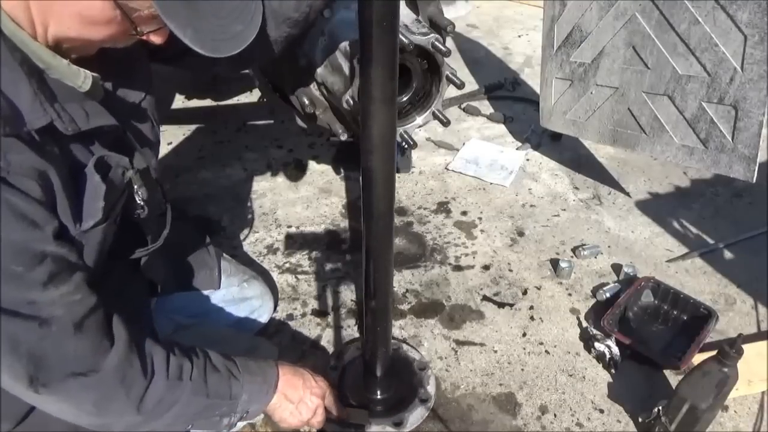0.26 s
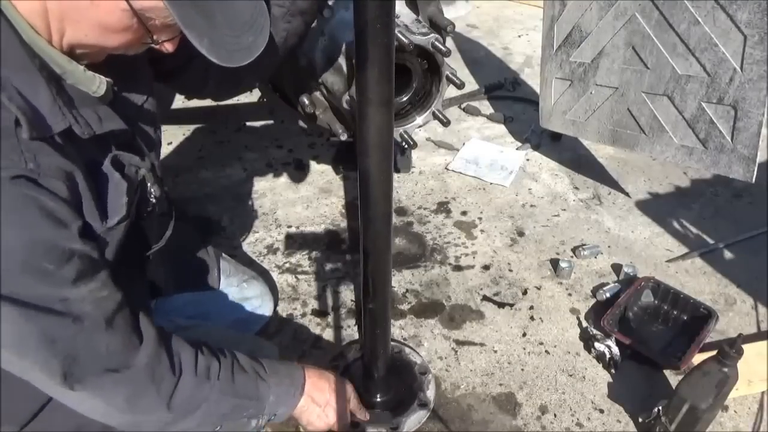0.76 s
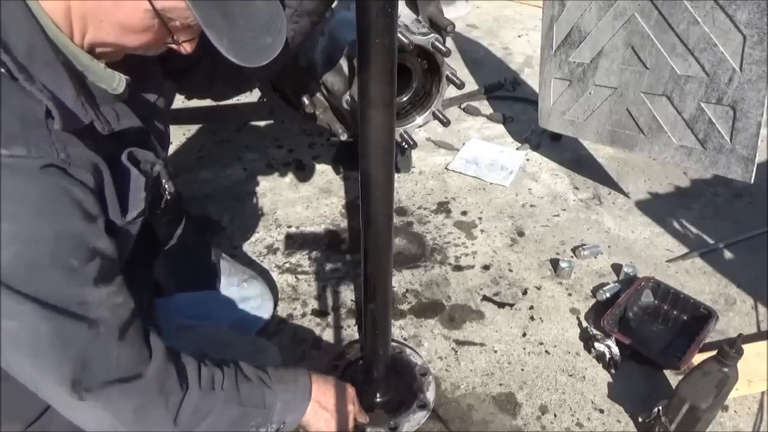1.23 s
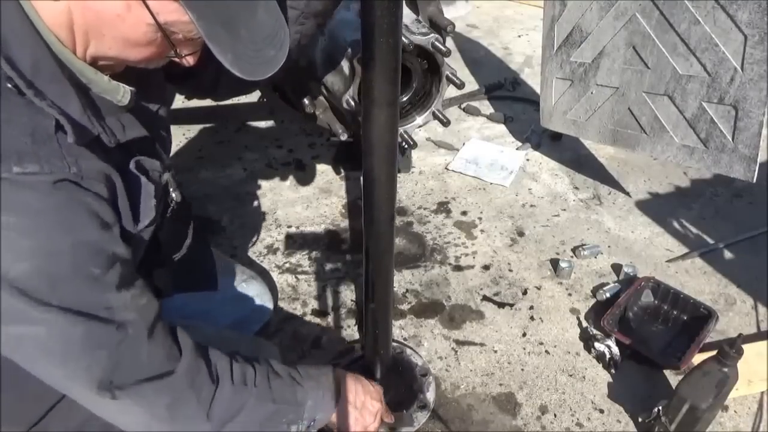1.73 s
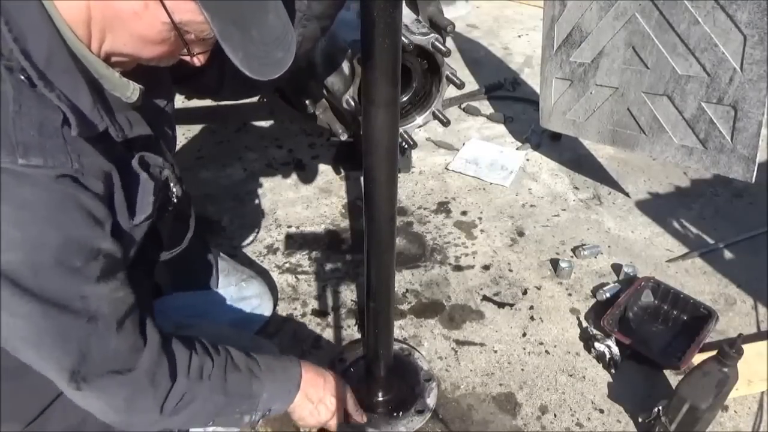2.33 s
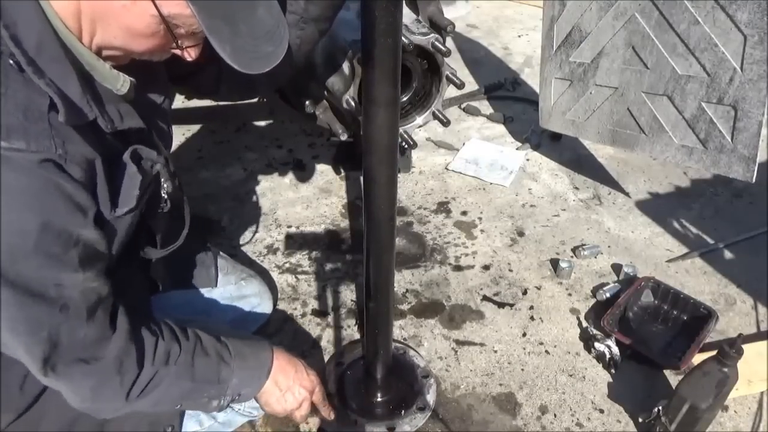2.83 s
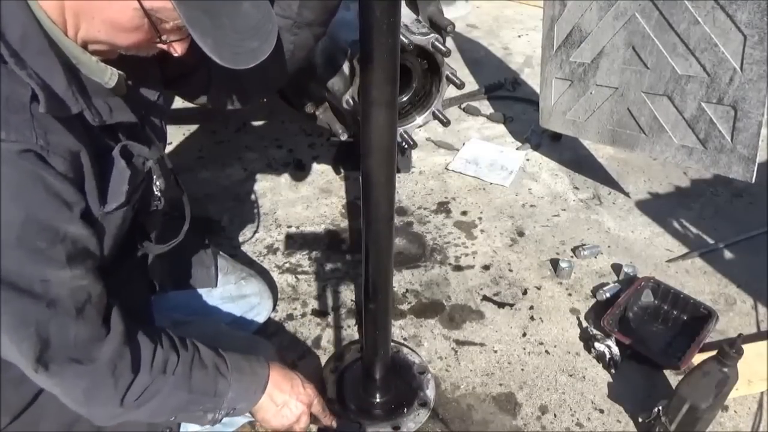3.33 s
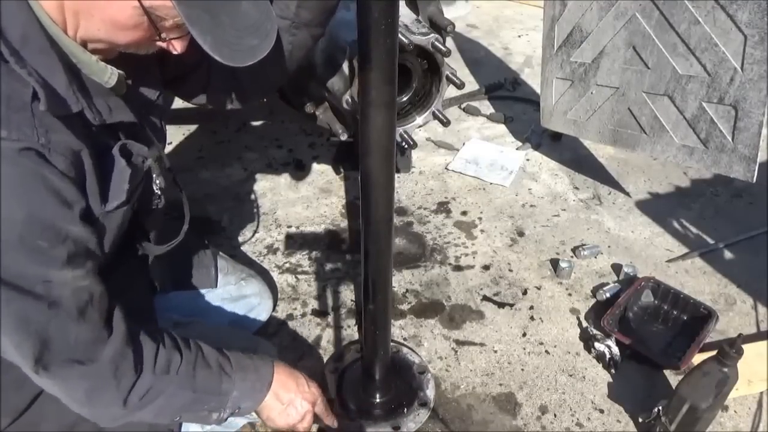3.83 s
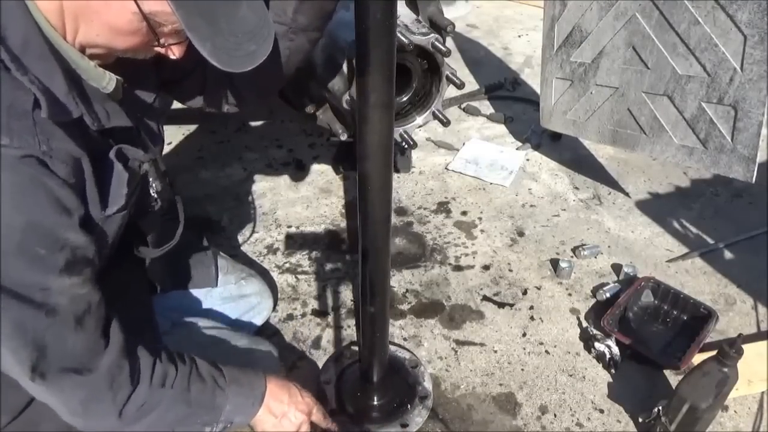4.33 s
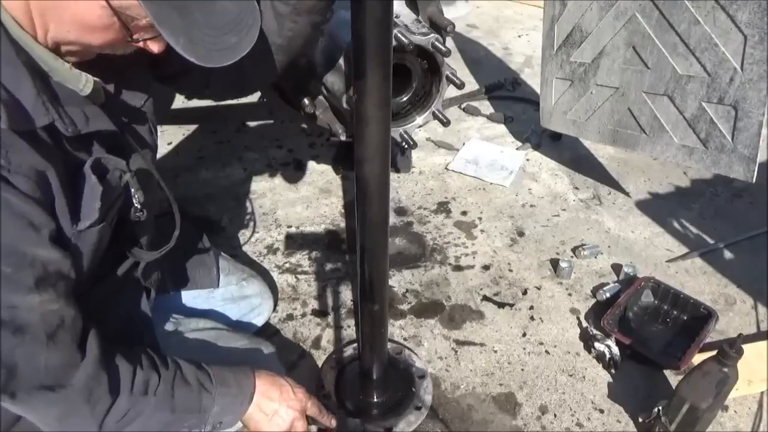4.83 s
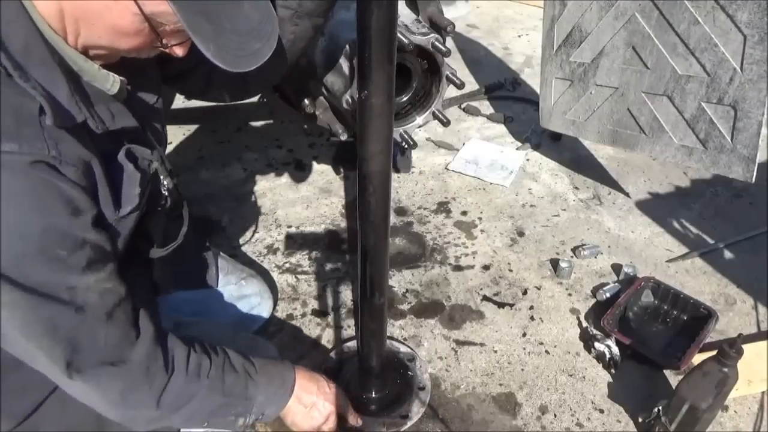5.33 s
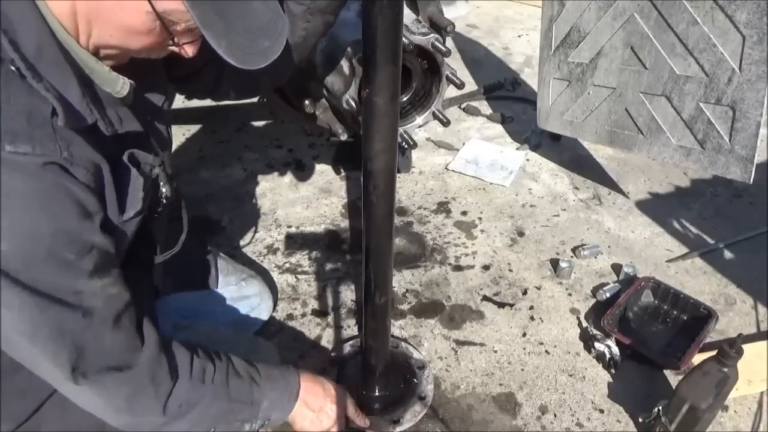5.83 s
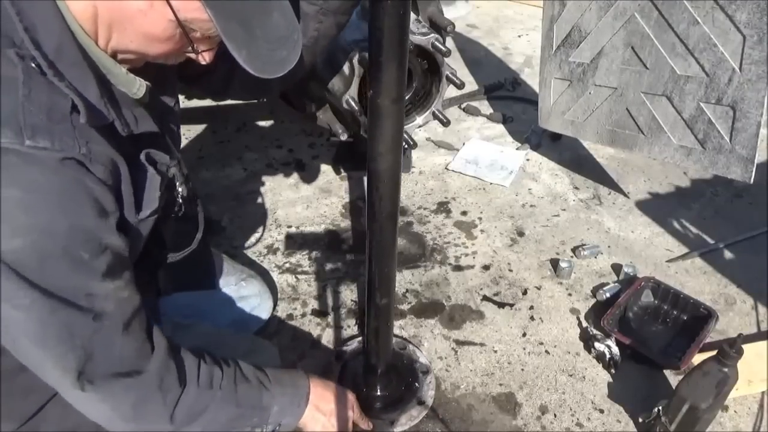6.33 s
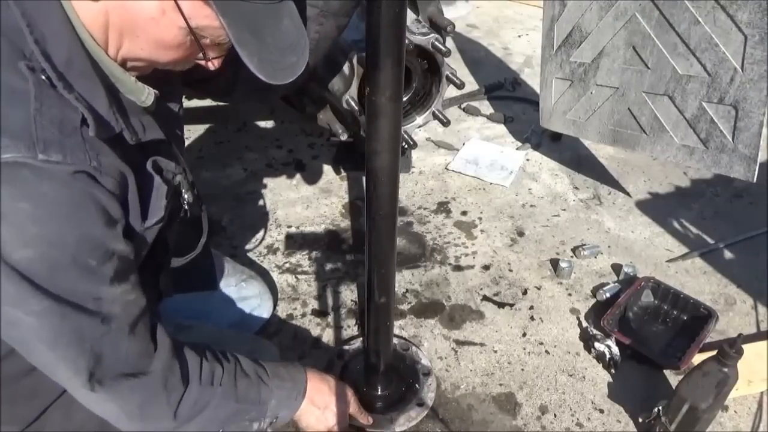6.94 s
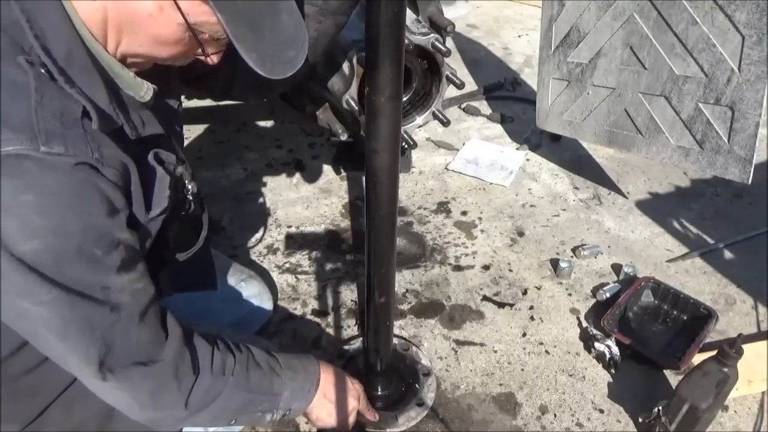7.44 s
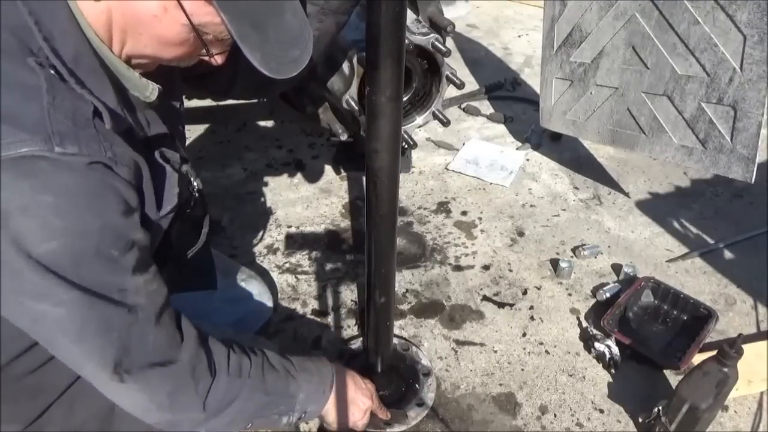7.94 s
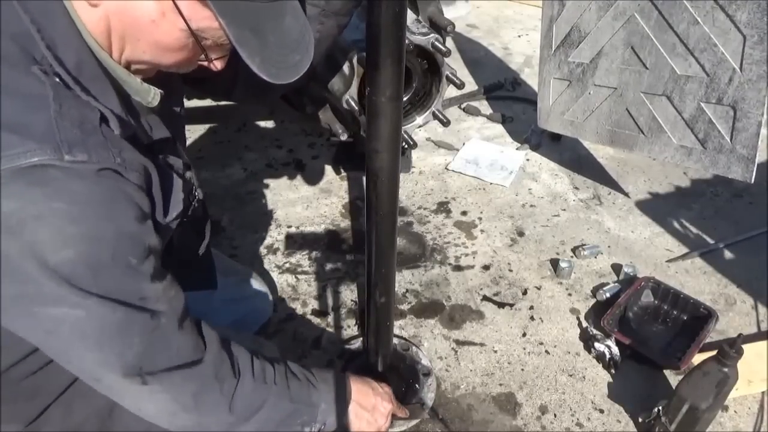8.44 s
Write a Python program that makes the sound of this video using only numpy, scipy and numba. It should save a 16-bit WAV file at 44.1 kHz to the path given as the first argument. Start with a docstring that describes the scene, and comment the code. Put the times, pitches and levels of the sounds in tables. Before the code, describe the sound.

A hand-held putty knife rasps stuck material off a steel axle part: short dry scratches in busy runs, with blade chatter and thin, damped ringing. Two lulls hold isolated taps and knocks before scraping picks up again. Open yard with slight reflections from the ground and a nearby wall, low traffic behind, and low wind buffets on the close microphone in the last two seconds.

```python
"""From the start a steel putty knife scrapes old gasket off a steel axle flange in quick to-and-fro strokes, outdoors
near a wall: noise for the grit drives broad blade rattles and long thin flange modes, which a hand damps.
Now and then the knife taps the flange, or its edge catches as a stroke sets off: short blows with blade chatter.
Distant traffic, shaped noise, hisses and rumbles throughout; towards the end gusts, bursts of
low noise, buffet the microphone."""
import sys
import numpy as np
from scipy import signal
from scipy.fft import rfft, irfft
from scipy.io import wavfile
from scipy.ndimage import uniform_filter1d
from numba import njit

SR = 44100
rng = np.random.default_rng(int(sys.argv[2]) if len(sys.argv) > 2 else 0)


def persist_wave(psi):
    """Save psi, clipped to +-1, as 16-bit WAV."""
    counts = np.round(np.clip(psi, -1, 1) * 32767).astype(np.int16)
    wavfile.write(sys.argv[1], SR, np.atleast_2d(counts).T)


def natural_amplitude(level_db):
    """Convert a level in decibels to a linear amplitude factor, elementwise."""
    exponent = np.asarray(level_db, float) / 20
    return 10 ** exponent


N = 382347
T = np.arange(N) / SR  # s

# To-and-fro strokes. Each row: fastest moment in seconds, drive on the blade in dB, length in seconds,
# bite into the bare steel (flange drive over blade drive) in dB.
STROKES = [(.003, -52.5, 0.061, 6), (0.189, -35, 0.19, -10), (0.408, -53.5, 0.094, 6.5),
           (0.523, -42, .1, -10.5), (0.74, -22.5, 0.11, -17), (0.902, -27.5, 0.096, -28),
           (1.067, -23.5, .12, -20.5), (1.248, -28.5, .1, -21), (1.418, -25.5, 0.11, -20),
           (1.584, -24.5, 0.094, -32.5), (1.722, -24, 0.079, -15.5), (1.869, -31, 0.09, -11),
           (1.989, -32.5, 0.075, -6.5), (2.16, -22, 0.11, -19), (2.309, -24, 0.088, -14),
           (2.442, -24, .1, -21), (2.586, -30.5, 0.091, -9.5), (2.718, -28.5, 0.089, -22),
           (2.818, -43.5, 0.045, -3), (2.973, -42.5, 0.063, -11), (3.103, -36, 0.1, -9.5),
           (3.279, -34.5, 0.059, -18), (3.426, -33, 0.099, -5), (3.559, -34, 0.08, -13),
           (3.685, -26, 0.073, -12), (3.82, -31.5, 0.09, -23), (3.953, -21.5, 0.082, -13.5),
           (4.101, -25, 0.098, -22), (4.416, -32.5, 0.11, -9.5), (4.505, -47, 0.075, -0.5),
           (4.639, -44.5, 0.14, -4.5), (4.776, -60, 0.095, 13), (4.921, -55.5, 0.15, 4),
           (5.251, -30, 0.11, -15), (5.408, -27.5, 0.09, -21.5), (5.557, -21, .09, -29),
           (5.688, -26.5, 0.082, -21), (5.874, -23.5, .099, -18.5), (6.016, -27.5, 0.074, -15.5),
           (6.157, -24.5, 0.08, -15.5), (6.297, -38, 0.065, -11), (6.415, -42.5, 0.066, -2.5),
           (6.634, -46, 0.03, -2.5), (6.845, -57.5, .077, -8), (6.993, -49, 0.051, -5),
           (7.104, -41, .074, -4), (7.234, -36, 0.065, -12.5), (7.352, -35, 0.064, -4),
           (7.48, -37, 0.057, -13.5), (7.604, -37, 0.082, -5), (7.731, -34.5, 0.063, -18),
           (7.857, -31.5, .089, -7.5), (8.0, -32.5, 0.084, -20), (8.14, -28.5, 0.093, -14.5),
           (8.284, -30.5, 0.093, -17.5), (8.436, -29.5, 0.1, -11), (8.593, -34.5, 0.12, -14)]
# How the knife leans. Each row: time in seconds, pitch factor of the edge rattle,
# drive of the blade's edge over its body in dB.
LEAN = [(0, 0.99, 2), (1.1, 0.97, -5), (1.7, .985, 3.2), (2.8, 1.004, 0.5), (3.2, 0.99, 3.5), (3.9, 1, 1.5),
        (4.5, .99, 2.5), (5.3, 0.98, 0), (6.2, 1.004, 0.3), (7.1, 1.014, 3.5), (8.0, 1.013, 5),
        (8.67, 1.01, -2)]
# Nearness to the rim as the knife works round the flange. Each row: time in seconds, rim drive in dB.
RIM_REACH = [(0, -9.5), (.5, -11.5), (.9, -2.5), (1.4, -11.5), (2.2, -5), (2.7, -4.5), (3.3, -7),
             (3.75, -4), (4.4, -9), (5.3, -8), (5.62, -0.5), (6.0, -11), (7.1, -4.5), (7.9, -6.5),
             (8.4, -8.5), (8.67, -15)]
# Knocks of the knife on the flange. Each row: time in seconds, strength in dB,
# face push relative to that in dB, hardness (treble tilt) in dB per octave.
TAPS = [(.3894, -48, -24, 7), (2.8205, -28, -10, -7), (4.1694, -32.5, -3.5, 2.5), (4.2735, -42, 6.5, -3),
        (4.4533, -21, -26, -16), (4.7644, -46, 4.5, -1), (5.0095, -20.5, -26.5, 0.5), (5.5365, -15, -43, 6),
        (6.4121, -18.5, -5.5, -10), (6.614, -34, -19, 7), (6.633, -21.5, -28, 4), (6.7786, -22, -25, 0.5)]
# The edge catching on gasket as a stroke sets off. Each row: time in seconds, strength in dB.
CATCHES = [(1.2021, -41), (3.2404, -37), (3.9045, -34), (4.3635, -30), (5.4992, -24.5), (5.8222, -29),
           (6.12, -26.5), (6.987, -41), (7.3165, -34.5), (7.568, -32), (7.8096, -35), (8.097, -25.5)]
# Broad rattles of the flexing blade. Each row: resting pitch in Hz, width in Hz, relative level in dB.
BLADE = [(2176, 316, -19.5), (2506, 1480, -19.5), (3410, 510, -26.5), (4280, 970, -16.5), (6342, 817, -5.5),
         (7706, 780, -13.5), (9570, 1270, -8.5), (10940, 1570, -17)]
# Flange face modes that sound together: one pitch in Hz per entry.
FACE_HZ = 939, 1419, 1927, 2025, 2829, 3322, 3774, 4918, 7014, 7787, 9654
# Their sound. Each row: relative level in dB, t60 in seconds before the hand acts, left minus right in dB.
FACE_MODES = [(-8, 0.17, 3.6), (-1.6, 0.3, 1.6), (-4, 0.62, 1.8), (-1, 0.23, 0.92), (-23, 0.39, .6),
              (-5.5, 0.47, 0.46), (-11.5, 0.23, 0.37), (-10.5, 0.38, .7), (-20, 0.6, 4.6), (-17, 0.73, 1.6),
              (-10, 0.58, .4)]
# Flange rim modes that sound together: one pitch in Hz per entry.
RIM_HZ = 2625, 4250, 5935, 6381, 8355, 10920
# Their sound. Each row: relative level in dB, t60 in seconds before the hand acts, left minus right in dB.
RIM_MODES = [(6.5, 0.2, -1.4), (0, 0.24, 2), (-4, 0.5, 4.5), (-14, 0.1, 28), (-6.5, 0.16, -7),
             (-5.5, 0.23, 1)]
# The damping hand. Each row: time in seconds, factor on how fast the flange dies away.
HAND = [(0, 0.58), (2.7, 1.04), (4.2, 1.18), (4.95, 0.85), (6.3, 0.81), (6.45, 1.95), (7.1, 1.3),
        (8.67, 1.1)]
# Colour of the traffic hiss. Each row: frequency in Hz, relative density in dB per Hz.
TRAFFIC_COLOUR = [(18, -27), (30, 1), (91, 0.5), (443, -9), (802, -4), (1810, -10.5), (2000, -14),
                  (3120, -18), (11000, -15), (14300, -56), (22000, -120)]
# Stereo width of the hiss. Each row: frequency in Hz, side relative to mid in dB (shape only).
TRAFFIC_SIDE = [(60, -24.5), (250, -17), (600, -11.5), (2000, -7.5), (8000, -9)]
# Colour of the traffic rumble. Each row: frequency in Hz, relative density in dB per Hz.
RUMBLE_COLOUR = [(20, -19), (60, 5.0), (125, 2.5), (250, -4.5), (500, -5.0), (2000, -52)]
# Swell of the rumble. Each row: time in seconds, mean level in dB.
SWELL = [(0, -59), (2.1, -61.5), (4.6, -56), (6.6, -62), (8.67, -64)]
# Gusts on the microphone. Each row: peak moment in seconds, strength in dB, length in seconds.
GUSTS = [(6.793, -43.5, 0.16), (7.097, -65, .14), (7.297, -32.5, 0.065), (7.474, -41.5, 0.13),
         (7.714, -43.5, 0.048), (7.853, -31, 0.17), (8.035, -39, 0.13), (8.05, -45, 0.68),
         (8.176, -41, 0.059), (8.383, -35.5, 0.15), (8.583, -37.5, .15)]
# Colour of the wind common to both channels. Each row: frequency in Hz, relative density in dB per Hz.
WIND_MID = [(15, -43), (25, -12.5), (113, 0.5), (286, -17), (454, -29), (800, -29), (1040, -56),
            (1760, -120)]
# Colour of the wind that differs between channels. Each row: frequency in Hz, relative density in dB per Hz.
WIND_SIDE = [(15, -49), (25, -22), (81, -2), (245, -6), (334, -16), (1000, -25), (1300, -55), (2200, -120)]

EDGE_HZ = 8000  # blade rattles above this belong to the edge, the rest to the body
RIM_PER_BITE = 0.44  # the rim rings with part of the bite that rings the face
TAP_EDGE_DB, TAP_RIM_DB, TAP_CHATTER_S = 3.5, -23, 0.0019
CATCH_EDGE_DB, CATCH_FACE_DB, CATCH_RIM_DB = 4, -13, -22
CATCH_HARD_DB, CATCH_CHATTER_S = 4, 0.0077  # dB per octave, s
MID, SIDE = np.array([[1], [1]]), np.array([[1], [-1]])  # left and right alike, left and right opposed


def curve(rows, column=1):
    """Straight lines in time along one column of a table."""
    columns = np.transpose(rows)
    return np.interp(T, columns[0], columns[column])


def unit(x):
    """Scaled to rms 1."""
    return x / np.sqrt(np.mean(x ** 2))


def noise(colour):
    """Noise of rms 1 shaped by (Hz, dB) points, joined along log frequency."""
    hz, db = np.transpose(colour)
    f = np.arange(N // 2 + 1) * SR / N + 1
    shape = natural_amplitude(np.interp(np.log(f), np.log(hz), db))
    return unit(irfft(rfft(rng.standard_normal(N)) * shape, N))


def walk(rate):
    """Random levels of rms 1, a new one every 1 / rate s, with sloping joins."""
    k = int(SR / rate)
    steps = np.repeat(rng.standard_normal(N // k + 1), k)
    return unit(uniform_filter1d(steps, k)[:N])


def hump(s, length, share, shape):
    """Where an event lies, and its gain there: 10 dB under the peak at both ends of its length."""
    rise, fall = share * length, (1 - share) * length
    near = slice(max(int((s - 3 * rise) * SR), 0), int((s + 3 * fall) * SR))
    lag = (T[near] - s) / np.where(T[near] < s, rise, fall)
    return near, natural_amplitude(-10 * np.abs(lag) ** shape)


@njit
def ring(force, hz, decay):
    """One mode with moving pitch and decay (per s); white force of rms 1 gives rms near 1."""
    out, z = np.empty(len(force)), 0j
    for i in range(len(force)):
        z = z * np.exp((2j * np.pi * hz[i] - decay[i]) / SR) + force[i]
        out[i] = z.imag
    return out * np.sqrt(4 * decay.mean() / SR)


def rubbing():
    """Friction of the sliding edge on blade body, blade edge, face modes and rim modes, stroke by stroke."""
    rub = np.zeros((4, N))
    for s, db, length, bite in STROKES:
        # share: part of a stroke before its fastest moment; shape: flatness of its top
        near, gain = hump(s, length, share=0.54, shape=2.18)
        rub[:, near] += natural_amplitude(db + np.array([[0], [0], [bite], [RIM_PER_BITE * bite]])) * gain
    edge_db = curve(LEAN, column=2)
    rub[:2] *= natural_amplitude(np.array([-edge_db, edge_db]) / 2)
    rub[3] *= natural_amplitude(curve(RIM_REACH))
    blade_and_flange = grit(depth_db=2.0, chip_db=5.0)
    return rub * np.repeat(blade_and_flange, 2, axis=0) + 1e-18


def grit(depth_db, chip_db):
    """Friction forces on blade and flange: noise that catches and slips every few ms, with lone chips breaking off."""
    slips = natural_amplitude(depth_db * (0.5 * walk(180) + 0.78 * walk(45)))
    chip_here = rng.random(N) < 300 / SR  # 300 chips a second on average
    chips = chip_here * natural_amplitude(chip_db + 4.1 * np.minimum(rng.exponential(size=N), 2))
    return unit(slips * rng.standard_normal((2, N)) * (1 + chips))


def blade(force):
    """Broad resonances with dark valleys between; they slide a little as the blade bends."""
    out, bend, lean = 0, 1 + 0.014 * walk(9), curve(LEAN)
    for k, (hz, width, db) in enumerate(BLADE):
        edge = int(hz > EDGE_HZ)
        pitch = hz * bend * lean ** edge
        decay = np.full(N, np.pi * width)
        once = ring(force[edge], pitch, decay)
        twice = ring(once, pitch, decay) * np.sqrt(width / SR)
        # neighbouring modes swing in opposite sense
        out = out + (-1) ** k * natural_amplitude(db + 2.63 * walk(14)) * twice
    return natural_amplitude(9.0) * out


def blows():
    """Taps and catches as rows (s, strength dB, edge dB, face dB, rim dB, hardness dB per octave, chatter s)."""
    taps = [(s, db, TAP_EDGE_DB, face, TAP_RIM_DB, hard, TAP_CHATTER_S) for s, db, face, hard in TAPS]
    catches = [(s, db, CATCH_EDGE_DB, CATCH_FACE_DB, CATCH_RIM_DB, CATCH_HARD_DB, CATCH_CHATTER_S)
               for s, db in CATCHES]
    return taps + catches


def chatter():
    """After each blow the body and edge of the blade bounce for a few ms: fading noise."""
    out, length = np.zeros((2, N)), 1500
    for s, db, edge, _, _, _, fade in blows():
        start = int(s * SR)
        bounce = rng.standard_normal(length) * np.exp(-T[:length] / fade)
        out[:, start:start + length] += natural_amplitude(db + np.array([[-edge / 2], [edge / 2]])) * bounce
    return out


def flange(rub):
    """Long thin modes, rubbed at a shifting point and struck by the blows; each radiates its own way."""
    out, hand = 0, curve(HAND)
    s, strength_db, _, face_db, rim_db, hard_db, _ = np.transpose(blows())
    struck = (s * SR).astype(int)
    families = [(FACE_HZ, FACE_MODES, rub[0], face_db), (RIM_HZ, RIM_MODES, rub[1], rim_db)]
    for pitches, modes, force, blow_db in families:
        for hz, (db, t60, pan_db) in zip(pitches, modes):
            push = force * natural_amplitude(2.37 * walk(6))
            # a soft blow strikes the lower modes harder and misses the upper modes
            push[struck] += natural_amplitude(21.5 + strength_db + blow_db + hard_db * np.log2(hz / 2000))
            tone = ring(push, np.full(N, 1. * hz), hand * np.log(1000) / t60)
            out = out + natural_amplitude(db + SIDE * pan_db / 2) * tone
    return out


def yard(x, t60, wet_db, far_t60, far_db):
    """Short scatter off the ground and the axle, a faint longer tail off the walls; different in each channel."""
    t = T[:SR // 2]
    fade = 1000. ** (-t / t60) + natural_amplitude(far_db) * 1000. ** (-t / far_t60)
    tail = rng.standard_normal((2, len(t))) * fade * (t > .0015)
    tail /= np.linalg.norm(tail, axis=1)[:, None]
    return x + natural_amplitude(wet_db) * signal.fftconvolve(x, tail, axes=1)[:, :N]


def traffic():
    """Far hiss, wider in the treble, over a swelling rumble."""
    side_hz, side_db = np.transpose(TRAFFIC_SIDE)
    side = [(hz, db + np.interp(np.log(hz), np.log(side_hz), side_db)) for hz, db in TRAFFIC_COLOUR]
    hiss = natural_amplitude(-53) * (noise(TRAFFIC_COLOUR) + natural_amplitude(-9.0) * noise(side) * SIDE)
    # the treble, much softened, comes and goes with the air
    treble = signal.sosfilt(signal.butter(2, 2800, "high", fs=SR, output="sos"), hiss)
    air = natural_amplitude(3.7 * walk(4) - 17)
    rumble = natural_amplitude(curve(SWELL) + 0.95 * walk(2.97)) * noise(RUMBLE_COLOUR)
    return hiss + (air - 1) * treble + rumble


def wind():
    """Eddies thump on the microphone as bursts of low noise, mostly alike in both channels in the bass."""
    gust = np.zeros(N)
    for s, db, length in GUSTS:
        near, gain = hump(s, length, share=0.51, shape=1.38)
        gust[near] += natural_amplitude(db) * gain
    eddies = noise(WIND_MID) * MID + natural_amplitude(-8.5) * noise(WIND_SIDE) * SIDE
    return gust * natural_amplitude(3.3 * walk(30)) * eddies


def scene():
    """Knife and flange in the yard, over traffic and wind."""
    rub = rubbing()
    knife = blade(rub[:2] + chatter()) * natural_amplitude(0.6 * SIDE)  # a little to the left
    # small steel parts radiate little bass
    high_pass = signal.butter(4, 1200, "high", fs=SR, output="sos")
    steel = signal.sosfilt(high_pass, knife + flange(rub[2:]))
    return yard(steel, t60=0.098, wet_db=-13.5, far_t60=0.68, far_db=-23.5) + traffic() + wind()


def top_cut(x):
    """A second steep cut: nothing passes above about 12.4 kHz."""
    return signal.sosfilt(signal.butter(12, 12360, fs=SR, output="sos"), x)


def record(dry):
    """The recorder cuts the top steeply above 11 kHz."""
    low_pass = signal.ellip(14, .3, 90, 11010, fs=SR, output="sos")
    mix = signal.sosfilt(low_pass, dry)
    return top_cut(mix)


dry = scene()
out = record(dry)
persist_wave(out)
```